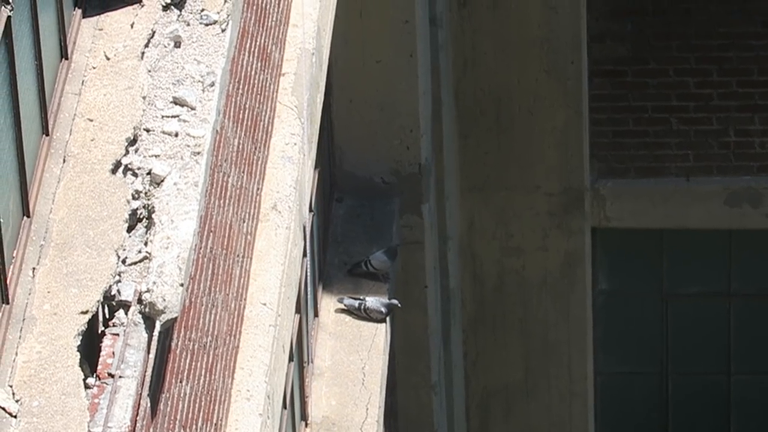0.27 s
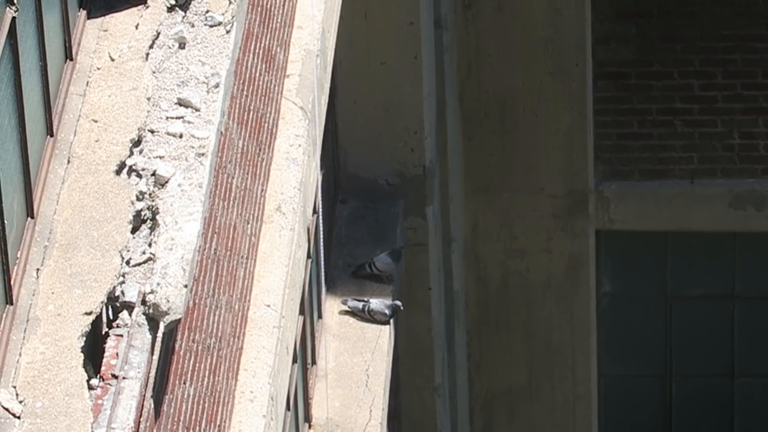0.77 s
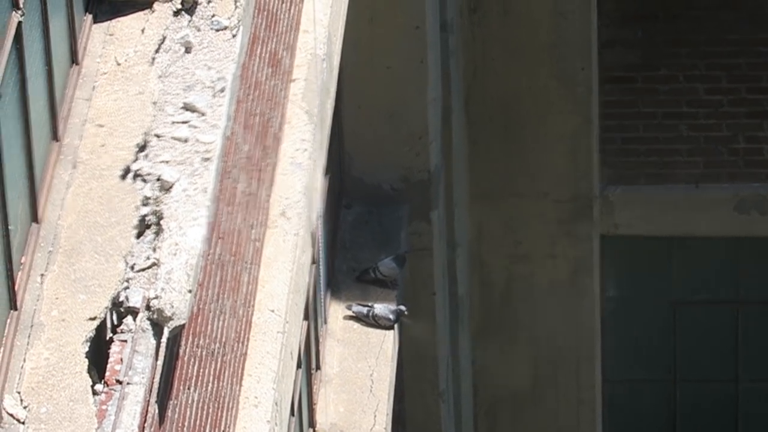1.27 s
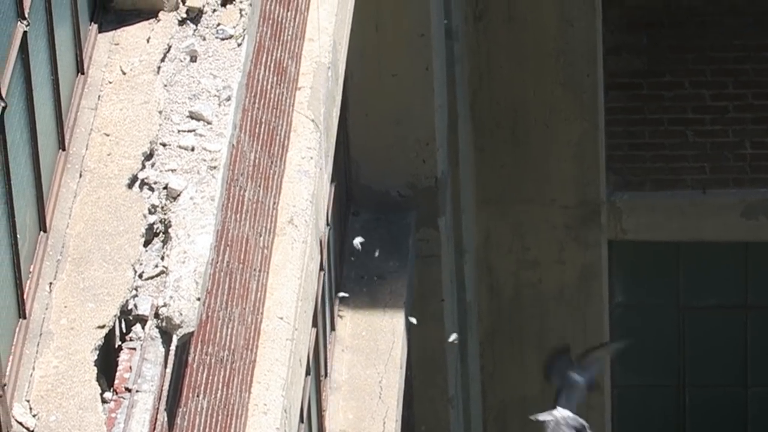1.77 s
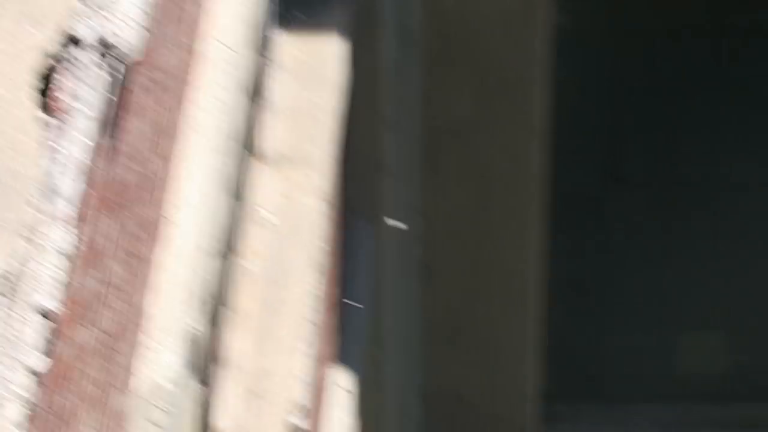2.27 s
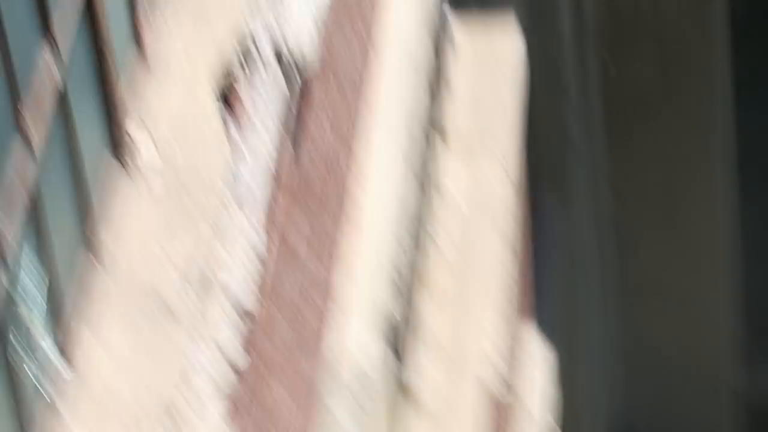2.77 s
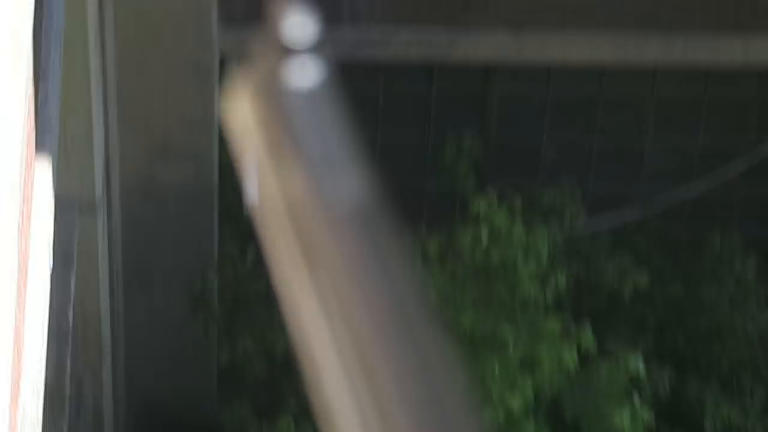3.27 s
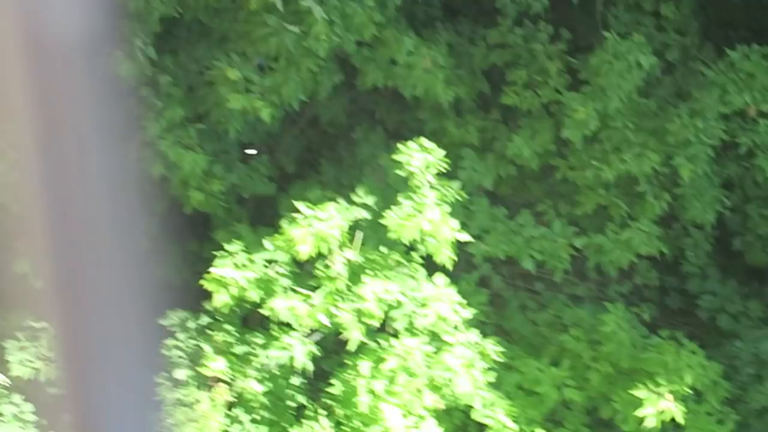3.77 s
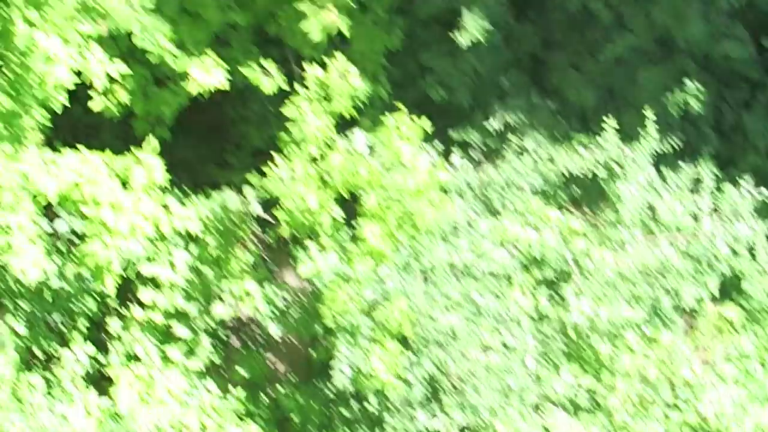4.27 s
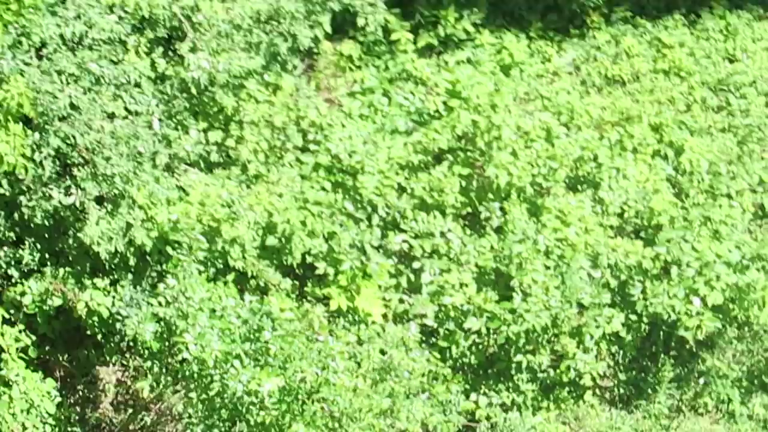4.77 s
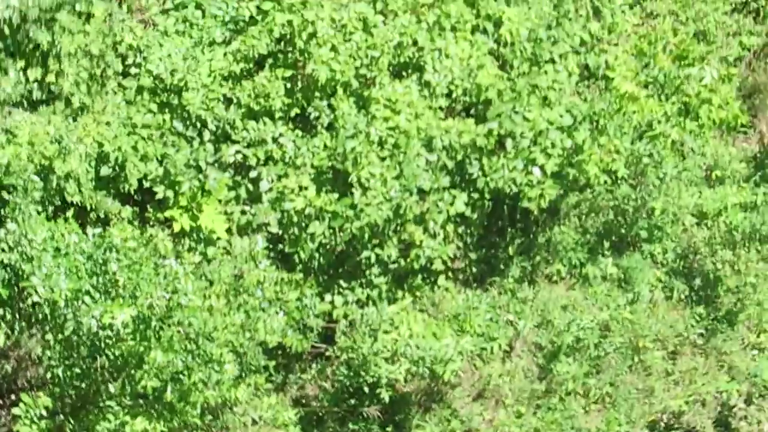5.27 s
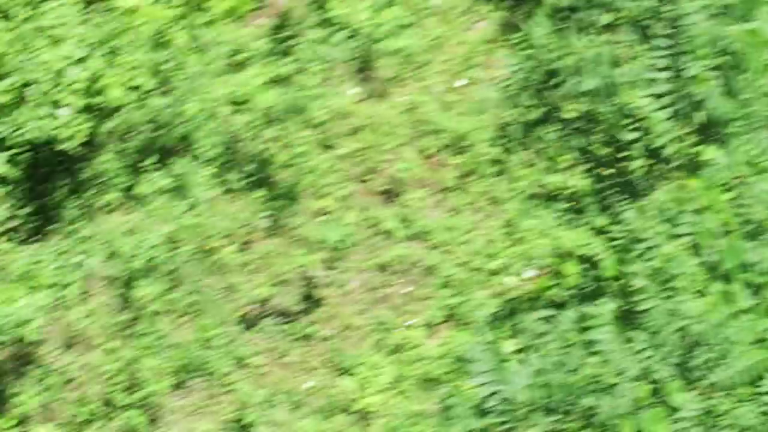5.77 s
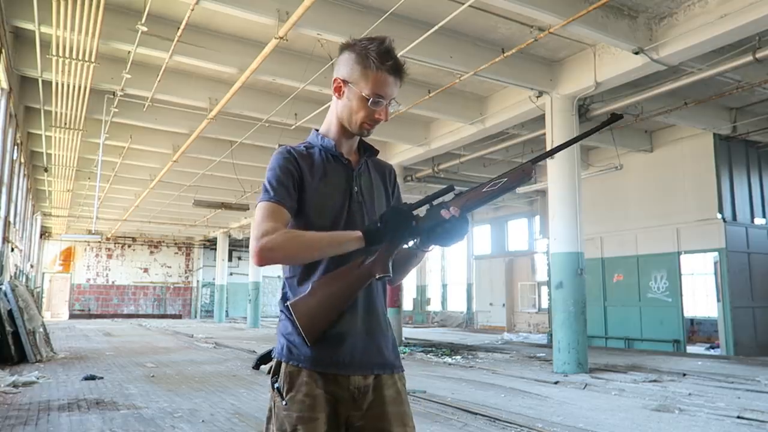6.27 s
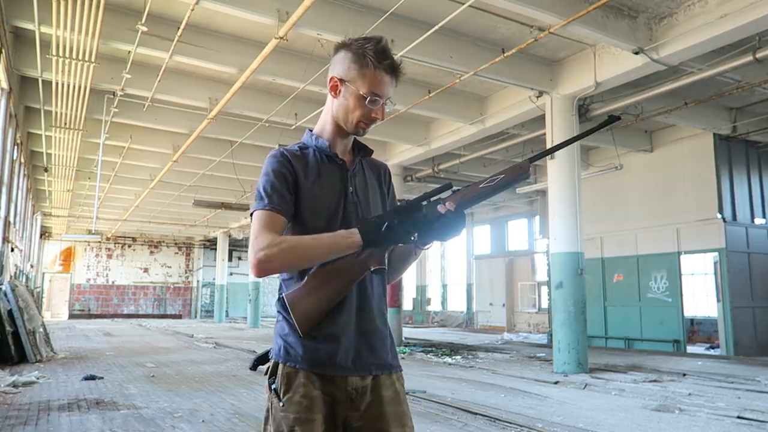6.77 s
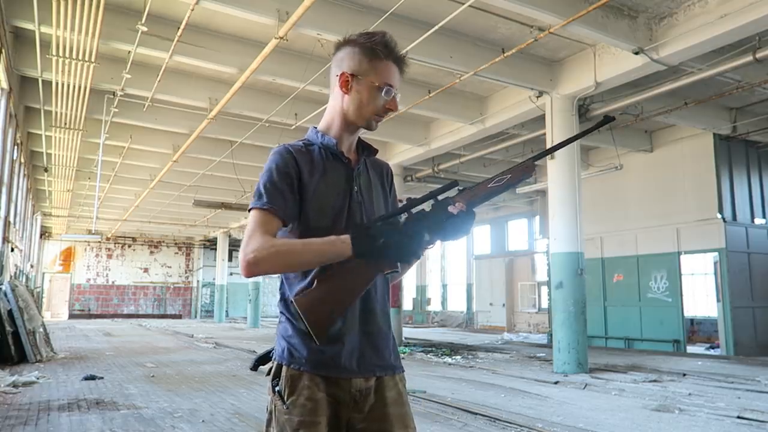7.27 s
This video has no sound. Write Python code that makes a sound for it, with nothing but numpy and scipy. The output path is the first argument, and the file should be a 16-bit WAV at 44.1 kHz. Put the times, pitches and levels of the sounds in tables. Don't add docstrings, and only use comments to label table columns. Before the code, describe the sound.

For 1.3 seconds there is steady low city rumble and drone with a wavering mid-pitched machine hum. At about 1.33 the rifle's sear and hammer click into a sharp, overloaded air blast peaking at 1.36, with a stock thump and yard echoes; the background ducks and slowly returns. The pellet smacks a ledge at 1.45, and wings clap five times from 1.56 to 1.96, fading. From 1.9 to 3.4 cloth rubs, grip ticks and a sling swivel drags; a bolt scrapes and drops home around 4.0, with another handling bump at 4.15. Wind buffets the microphone strongly from 5.4 to 5.9. At 5.96 the place switches to a wide concrete hall: gloved touches, bright steel clack at 6.26, loudest slam at 6.39, small rattles and a long ring, finger touches near 6.9, then a softer latch clack at 7.11 with settling parts and echo.

```python
import sys
import numpy as np
from scipy import signal
from scipy.io import wavfile
from scipy.ndimage import uniform_filter1d

SR = 44100
rng = np.random.default_rng(int(sys.argv[2]) if len(sys.argv) > 2 else 0)


def log_audio(samples):
    frames = np.atleast_2d(samples).T
    limited = np.clip(frames, -1, 1)
    pcm = np.round(limited * 32767).astype(np.int16)
    wavfile.write(sys.argv[1], SR, pcm)


def voltage_ratio(decibels):
    exponent = np.asarray(decibels, float) / 20
    return 10 ** exponent


N = 330750
CUT_S = 5.958
OUTSIDE_SAMPLES = round((CUT_S + .05) * SR)

BAND_EDGES_HZ = 22 * 2 ** np.arange(0, 9.7, .4)
BANK = [(np.sqrt(low * high), signal.butter(2, [low, high], "band", fs=SR, output="sos"))
        for low, high in zip(BAND_EDGES_HZ, BAND_EDGES_HZ[1:])]

# frequency in Hz, level in dB per Hz.
RUMBLE_COLOUR = [(12, -41), (20, -15), (54, -5), (113, 1.5), (150, -0.5), (200, -22), (330, -120)]
DRONE_COLOUR = [(71, -33), (120, -17.5), (206, -4.5), (304, -9.5), (357, -11), (403, -13), (572, -9.5),
                (1180, -18), (3000, -40), (3900, -70), (6600, -120)]
HISS_COLOUR = [(1060, -13.5), (1800, -10.5), (2870, -18), (8280, -26.5), (12100, -29.5), (14100, -44),
               (16000, -62.5)]
# frequency in Hz, likeness from -1 to 1.
OUT_LIKENESS = [(60, 1.0), (180, 1), (550, 0.97), (1650, 0.86), (4970, 0.27), (15000, -0.45)]
IN_LIKENESS = [(60, 0.99), (180, 0.56), (550, 0.46), (1650, 0.99), (4970, 0.66), (15000, -0.85)]
# frequency in Hz, width in Hz, level in dB.
HUM_LINES = [(362, 14.2, 1), (737, 4.5, -9.5), (628, 84, -7), (1203, 3, -15), (197.4, 22, -9),
             (576.9, 6.7, -7)]
LOW_HUM_HZ, OVERTONE_HZ = 311.7, 716
HUM_EDGE_S, HUM_EVENNESS, BREEZE_EDGE_S = 0.023, 0.52, 0.18
# start in seconds, length in seconds, level in dB.
HUM_SWELLS = [(0.17, 0.168, -46.5), (0.45, 0.077, -40), (0.72, 0.073, -42), (1.09, 0.086, -43.5),
              (1.25, 0.071, -47), (2.4, 0.19, -61.5), (2.68, 0.14, -61), (2.9, 0.11, -66),
              (3.12, 0.21, -59), (3.6, 0.18, -57), (3.86, 0.12, -41.5), (4.02, 0.29, -44),
              (4.36, 0.069, -42.5), (4.52, 0.22, -41.5), (4.88, 0.068, -42.5), (5.19, 0.039, -43),
              (5.36, 0.069, -48), (5.8, 0.17, -47)]
LOW_SWELLS = [(0.0, 0.15, -35), (0.25, 0.096, -41.5), (0.4, 0.2, -43.5), (0.62, 0.1, -40),
              (0.89, 0.17, -44.5), (1.26, 0.067, -38.5)]
OVERTONE_SWELLS = [(2.35, 0.33, -65), (2.8, 0.33, -53), (3.4, 0.48, -59.5), (5.3, 0.39, -62)]
# start in seconds, length in seconds, level in dB.
THUDS = [
    (1.0, 0.2, -42.5),
    (3.55, 0.13, -66),
    (3.95, 0.36, -61),
]
TREE_GUST = [(5.3, 0.55, -55)]
BREEZE = [(1.9, 0.77, -68), (4.05, 0.67, -63.5), (5.2, 0.86, -68)]
# calm level in dB, duck depth in dB, recovery in seconds, recovery shape.
RUMBLE_GAIN = (-44.5, 32, 2.5, 1.7)
DRONE_GAIN = (-38.5, 23, 2, 2)
HISS_GAIN = (-60.5, 14, 1.47, 2.5)
HUM_GAIN = (-51, 20, 0.96, 2)
HALL_GAIN = (-44.5, 8.5, 1.15, 1.2)
SHOT_DUCK_S, HALL_DUCK_S, DUCK_ATTACK_S = 1.37, 6.4, 0.045

# start in seconds, level in dB, t60 in seconds, tilt in dB per octave, ring in dB.
SHOT_STAGES = [(1.326, -25.5, 0.063, -2.5, -35), (1.3366, -7.5, 0.054, -1.5, -26),
               (1.342, -21, 0.081, -4.5, -25), (1.3495, -9, 0.1, 2, -28.5), (1.353, -9, 0.067, -2, -25),
               (1.3612, -3, 0.045, -1, -9.5), (1.3645, 0, 0.022, -1.8, -5.5),
               (1.377, -17, 0.016, 0.5, -39.5), (1.382, -17.5, 0.074, 1, -18.5),
               (1.398, -27.5, .05, -1, -32.5), (1.412, -27.5, 0.066, 3, -27)]
# frequency in Hz, level in dB per Hz.
BLAST_COLOUR = [(200, -22.5), (400, -13), (1100, -3), (1500, -5.5), (1900, -13), (2500, -9.5), (3900, -8),
                (8000, -13), (14000, -15), (16000, -34.5)]
# frequency in Hz, level in dB, t60 in seconds.
SHOT_MODES = [(434, -4.5, 0.035), (815, -9.5, 0.035), (1117, -5.5, 0.057), (1860, 2, 0.022),
              (3040, -10, .02), (4030, -6.5, 0.025)]
# start in seconds, level in dB, frequency in Hz, fade in seconds.
MUZZLE_SWING = (1.3623, -5.5, 232, .050)
# start in seconds, frequency in Hz, level in dB, t60 in seconds.
STOCK_THUMPS = [
    (1.3625, 92, -14.5, .06),
    (1.36, 56, -21, 0.098),
    (1.326, 170, -27, .04),
]
# frequency in Hz, level in dB per Hz.
YARD_COLOUR = [(120, -59.5), (200, -19), (353, -9.5), (491, -10.5), (1040, -4.5), (3130, -7),
               (12200, -19.5), (16000, -37)]
# frequency in Hz, t60 in seconds.
YARD_T60 = [(300, 1.7), (1500, 1.54), (5000, 1.23), (12000, 0.43)]
# start in seconds, level in dB, t60 in seconds, tilt in dB per octave, ring in dB.
JOLT = [
    (1.3532, -6, .05, -2, -11),
    (1.3562, -6.5, 0.042, -2, -10.5),
    (1.3595, -8.5, .04, -1, -13.5),
    (1.3635, -8.5, .03, -1, -20),
    (1.368, -12, .015, -5.5, -17),
]
# frequency in Hz, level in dB per Hz.
JOLT_COLOUR = [(250, -25), (450, -4), (800, 0), (1400, -2), (2000, -14), (2750, -8), (4000, -12),
               (16000, -30)]
# frequency in Hz, level in dB, t60 in seconds.
JOLT_MODES = [(480, -8, .022), (800, -1.5, .022), (1350, -4.5, .025), (2750, -3.5, .03)]

# start in seconds, level in dB, t60 in seconds, tilt in dB per octave.
STRIKES = [
    (1.4483, -19, 0.023, 0.5),
    (1.4605, -20.5, 0.046, 1),
    (1.4925, -30, 0.041, -8),
    (1.498, -24.5, 0.011, 4.5),
    (1.51, -30.5, 0.036, -1.5),
    (1.52, -34, 0.27, -1.5),
]
# level in dB, tilt in dB per octave.
CLAPS = [(-29.5, -2), (-35, -3.5), (-36, -4.5), (-42.5, -4.5), (-44, -4.5)]
FIRST_CLAP_S, CLAP_EVERY_S, CLAP_T60_S = 1.5585, .0993, 0.053

# start in seconds, level in dB, tilt in dB per octave.
RUSTLE = [(1.9072, -50, 5), (2.0314, -51.5, 1), (2.1277, -45.5, 0), (2.1492, -41, -6), (2.22, -52, -5),
          (2.2419, -39.5, -2), (2.2614, -39.5, -4), (2.273, -45, -9), (2.284, -49.5, 2),
          (2.3327, -43, -4.5), (2.36, -52, -4), (2.484, -49, -4), (2.4934, -42, -5.5), (2.596, -48, -5),
          (2.6001, -46, 4), (2.6234, -47.5, 0.5), (2.647, -47, -8), (2.6979, -41, -4), (2.7145, -47.5, 2),
          (2.731, -52, 0.5), (2.7662, -49, 1), (2.773, -51, 8.5), (2.784, -46, 6), (2.8012, -43.5, -2),
          (3.0167, -44, 28), (3.0989, -47, 3), (3.1353, -51, 5), (3.1737, -45, -6), (3.2181, -42, -1),
          (3.233, -45, -5.5), (3.2964, -37, -10), (3.3124, -43.5, -8), (3.322, -44, -7), (3.345, -43, -7),
          (4.136, -43, -1), (4.149, -33, -7), (4.2961, -44, -4)]
RUSTLE_T60_S, TOUCH_T60_S, TICK_T60_S = 0.032, 0.055, 0.045
# start in seconds, level in dB, t60 in seconds, tilt in dB per octave.
RUBS = [(1.9, -48, 0.28, -7), (2.03, -48, 0.26, -6), (2.125, -47.5, 0.31, -5), (2.24, -44.5, 0.31, -2),
        (2.33, -51, .25, -2), (2.42, -55, .2, -5), (2.59, -46.5, 0.23, -8), (2.695, -49, 0.22, 1.5),
        (2.76, -47, 0.33, -3), (3.1, -53, 0.27, 0), (3.225, -49, 0.14, -4), (4.1, -46, .15, 3)]
# frequency in Hz, level in dB per Hz.
CLOTH_COLOUR = [(700, -0.5), (1600, -1), (2500, 3), (5000, 2.5), (9000, -4.5), (13000, -8), (16000, -28)]
# start in seconds, frequency in Hz, level in dB, t60 in seconds.
PIN_PINGS = [(2.15, 4090, -50, .02), (2.333, 7600, -53, 0.035), (2.601, 4360, -56, .02),
             (2.713, 5200, -50, 0.028), (2.809, 4753, -57, 0.13), (3.388, 7600, -63, 0.027),
             (3.973, 3300, -46, 0.022), (4.002, 2660, -38, 0.055), (4.296, 2750, -55, 0.037)]
# start in seconds, scrape in dB, t60 in seconds, tilt in dB per octave, ring in dB.
BOLT = [
    (3.9707, -27.5, 0.11, -11, -26.5),
    (3.975, -47, 0.029, -5, -28.5),
]
SEAT = [
    (4.0015, -24, 0.033, -4, -31),
    (4.005, -40.5, 0.28, -2, -18),
    (4.025, -52, .05, -5, -42),
]
# frequency in Hz, level in dB, t60 in seconds.
BOLT_MODES = [(612, -15, 0.086), (975, -4.5, 0.08), (1045, -3.5, 0.084), (1260, -3, 0.027),
              (1668, -11, 0.069), (2710, -11, 0.037)]
SEAT_MODES = [(510, -7.5, 0.047), (1110, -11, 0.057), (1315, 0, 0.039), (2650, -4, 0.023)]
# start in seconds, scrape in dB, tilt in dB per octave, ring in dB.
SWIVEL_TICKS = [(3.104, -42, -11, -51), (3.116, -60, -3, -44), (3.173, -49, -1.5, -36.5),
                (3.200, -57, -3, -40.5), (3.218, -47, -5.5, -44.5), (3.250, -53, 4, -39),
                (3.279, -36, -9.5, -45), (3.326, -39, -7.5, -50)]
# start in seconds, scrape in dB, t60 in seconds, tilt in dB per octave, ring in dB.
SWIVEL_DRAGS = [(3.1, -42, 0.48, -10, -53), (3.16, -42.5, 0.32, -6, -46), (3.23, -43, 0.2, -6.5, -55),
                (3.309, -38, 0.22, -9, -49)]
# frequency in Hz, level in dB, t60 in seconds.
SWIVEL_MODES = [(344, -3, 0.018), (706, -1, 0.024), (1680, -0.5, 0.03), (1880, -1, 0.027), (2290, -6, .018),
                (2740, -12, 0.02)]

# frequency in Hz, level in dB per Hz.
WIND_COLOUR = [(12, -48), (20, -28), (75, 2.5), (101, 2), (239, -5), (380, -13.5), (407, -20.5),
               (520, -26.5), (680, -56), (1140, -120)]
# start in seconds, length in seconds, level in dB.
PUFFS = [(4.92, 0.015, -41), (5.21, 0.045, -35.5), (5.37, 0.07, -29.5), (5.46, 0.071, -30),
         (5.54, 0.086, -20.5), (5.64, 0.054, -20), (5.7, 0.036, -19), (5.75, 0.08, -26.5),
         (5.8, 0.11, -25.5), (5.4, 0.59, -34)]
PUFF_EDGE_S, WIND_PAN_DB, WIND_SWAY_DB = 0.02, -2.5, 1

# start in seconds, level in dB, tilt in dB per octave.
TOUCHES = [(6.0013, -40.5, -4), (6.034, -37, -13), (6.1055, -37.5, -0.5), (6.1245, -41, -1), (6.16, -50, 1),
           (6.8823, -36, -5.5), (6.92, -40, -7), (6.94, -30, -8), (6.9691, -38.5, -4), (7.2424, -46, -8),
           (7.4565, -38.5, -1)]
# frequency in Hz, level in dB per Hz.
GLOVE_COLOUR = [(1100, 0), (1800, -5), (3500, 1), (6000, -15), (11000, -14), (16000, -11.5)]
STEEL_COLOUR = [(120, -52), (200, -32), (1010, -9.5), (1220, -5.5), (1540, -6.5), (2680, -5), (4180, -6),
                (4840, -14.5), (6380, -14.5), (12400, -19), (16300, -22)]
HALL_COLOUR = [(150, -37.5), (300, -10), (750, -7), (1100, 1.5), (1600, 4.5), (2200, -0.5), (3300, -1),
               (4800, -7), (8000, -4.5), (15000, -23)]
HALL_AIR_COLOUR = [(12, -36), (20, -2.5), (107, -3), (399, -14), (485, -7), (558, -20), (1290, -19.5),
                   (3840, -35), (12400, -44), (14700, -51), (16000, -72)]
# frequency in Hz, t60 in seconds.
HALL_T60 = [(500, 3.2), (1400, 2.4), (2700, 2.37), (5400, 0.97), (8000, 0.54), (11000, 0.45)]
# start in seconds, level in dB, brightness from 0 to 1.
HALL_BLOWS = [
    (6.264, -3.5, 0.72),
    (6.394, 0.5, 0.29),
    (7.113, -5.5, 0.51),
    (6.939, -27, 0),
    (6.107, -22.5, 0.7),
]
# delay in seconds, spread in seconds, level in dB.
FAR_WALL = (0.11, 0.1, 3.2)
# start in seconds, scrape in dB, t60 in seconds, tilt in dB per octave, ring in dB.
LIFT = [
    (6.2636, -11, 0.0141, 0, -17),
    (6.2665, -26, 0.039, -1, -19),
    (6.2705, -19, 0.012, -1.5, -42),
    (6.279, -21, 0.15, -1, -25),
    (6.302, -30, 0.0624, 1, -29),
]
SLAM = [
    (6.3895, -25.5, 0.0382, -0.5, -30),
    (6.3935, 0.5, 0.012, 1.5, -2.5),
    (6.3952, -7.5, 0.009, 2, -14),
    (6.399, -13, 0.017, -3.5, -26),
    (6.411, -20, 0.028, -2, -36),
    (6.417, -23.5, 0.036, 3, -34),
    (6.438, -29.5, .03, 7, -37),
    (6.4435, -33, .04, 3, -35),
]
LATCH = [
    (7.103, -39.5, 0.104, 1.5, -62),
    (7.1132, -16.5, 0.0095, -1.4, -12.5),
    (7.1172, -21, 0.022, -2, -25),
    (7.131, -26, 0.067, 0.52, -46),
    (7.137, -30.5, 0.15, 2, -50),
]
# frequency in Hz, level in dB, t60 in seconds.
LIFT_MODES = [(1170, -25, 0.027), (1730, 0.5, 0.013), (2254, 6, 0.019), (2840, -1.5, 0.022),
              (3370, 2, 0.011), (11400, -5.5, 0.01)]
SLAM_MODES = [(298, -32, 0.0092), (560, -25, 0.022), (786, -13, 0.012), (1030, -5.5, 0.02),
              (1520, -3.5, 0.014), (1890, -3.5, 0.014), (2343, -1.5, 0.015), (2970, -12.5, 0.016),
              (3610, -8.5, 0.017), (6500, -26.5, .012)]
LATCH_MODES = [(1070, -7, 0.02), (1610, 0, 0.021), (2010, -11, 0.027), (3460, 7.5, 0.0062),
               (4250, -23, 0.013), (7100, -16, 0.0143)]
# frequency in Hz, width in Hz, level in dB.
HALL_RINGS = [(1080, 110, -1), (1440, 140, -2.5), (2090, 530, -8.5), (3400, 200, -8)]
HALL_PLAIN_DB = -3.5
# frequency in Hz, width in Hz, start in seconds, length in seconds, level in dB.
LINGERS = [
    (2750, 270, 6.28, 0.12, 3.5),
    (1500, 200, 7.185, 0.049, -3),
    (1450, 100, 6.43, 0.12, -0.5),
    (1060, 68, 6.42, 0.19, -4),
    (1500, 53, 6.64, .1, -1),
]
# start in seconds, length in seconds, level in dB.
HALL_THUDS = [
    (6.25, 0.17, -46),
    (6.85, 0.32, -49.5),
]
# start in seconds, level in dB, t60 in seconds, tilt in dB per octave.
CHATTER = [(6.2825, -25, .025, 3), (6.2895, -26, 0.027, 1.5), (6.309, -32, 0.072, 0),
           (6.326, -33.5, .04, 1), (7.1308, -24, .015, 1), (7.139, -33, .02, 3), (7.165, -32, 0.027, 3.5),
           (7.1843, -32, .03, -4), (7.203, -32.5, 0.032, -5.5)]
# start in seconds, frequency in Hz, level in dB, t60 in
# seconds.
ACTION_PINGS = [(6.3941, 1480, 0.5, 0.012), (6.3975, 2100, -17, .03), (6.3972, 1150, -18, .03),
                (6.3935, 200, -27.5, 0.047), (7.113, 3510, -16, .012), (6.2835, 2700, -30, .03),
                (6.302, 3000, -28, .03), (6.318, 9700, -42, .03), (7.1312, 9100, -34, .02),
                (7.131, 7200, -34, .02), (7.139, 5900, -37, .03), (7.165, 7400, -36, .025),
                (7.118, 7400, -36, .02), (7.1845, 1500, -33, .05)]


def rms_one(x):
    return x / np.sqrt(np.mean(x ** 2) + 1e-20)


def at_hz(points, hz):
    points_hz, values = np.array(points).T[:2]
    return np.interp(np.log(hz), np.log(points_hz), values)


def drift(rate_hz, size=N):
    r = np.exp(-80 * np.pi * rate_hz / SR)
    white = rng.standard_normal(size // 40 + 2002)
    slow = signal.lfilter([1], [1, -2 * r, r * r], white)[2000:]
    return np.interp(np.arange(size) / 40, np.arange(len(slow)), rms_one(slow))


def noise(spectrum, likeness, patchy_db=0., t60s=None, size=N):
    out = 0
    together = drift(2.4, size)
    white = rng.standard_normal((2, 2, size))
    for k, (hz, sos) in enumerate(BANK):
        if not spectrum[0][0] <= hz <= spectrum[-1][0] or at_hz(spectrum, hz) < -65:
            continue
        mid, side = signal.sosfilt(sos, white[k % 2])
        alike = np.clip(at_hz(likeness, hz), -.99, .99)
        level_db = at_hz(spectrum, hz) + patchy_db * (.6 * together + drift(22, size))
        if t60s:
            level_db = level_db - 60 * np.arange(size) / SR / at_hz(t60s, hz)
        gain = np.repeat(voltage_ratio(level_db[::8]), 8)[:size]
        out = out + gain * (np.sqrt(1 + alike) * mid + np.sqrt(1 - alike) * side * [[1], [-1]])
    return rms_one(out)


def lasting(rows, t60_s):
    return [(s, db, t60_s, *rest) for s, db, *rest in rows]


def knocks(events, spectrum, modes=(), grain_db=0., side_db=-10., side_tilt=4.2, patch_db=0., detune=0.,
           rise_share=0.02, snap_db=-60.5):
    out = np.zeros((2, N))
    t = np.arange(6000) / SR
    for s, peak_db, t60, tilt, *ring_db in events:
        rise = rise_share * t60
        patch = patch_db * rng.standard_normal(len(BANK))
        slip = 1 + detune * rng.standard_normal()
        attack = np.sin(np.pi / 2 * np.minimum(t / max(2 * rise, 1e-4), 1)) ** 2
        fade_db = -60 * np.maximum(t - 2 * rise, 0) / max(t60, .005)
        white = rng.standard_normal((2, len(t)))
        grit = white * voltage_ratio(grain_db * np.minimum(rng.exponential(1, len(t)), 5)) * attack
        grit[0, round(rise * SR)] += voltage_ratio(snap_db) * grit.std()
        heard = int((.01 + .8 * t60) * SR)
        grit, fade_db = grit[:, :heard], fade_db[:heard]
        sound = 0
        for k, (hz, sos) in enumerate(BANK):
            if hz > spectrum[0][0]:
                octave = np.log2(max(hz, 600) / 2000)
                port_db = np.array([[0], [side_db + side_tilt * octave]])
                gains = voltage_ratio(at_hz(spectrum, hz) + tilt * octave + patch[k] + port_db)
                faded = grit * voltage_ratio(fade_db * 2 ** (.15 * octave))
                sound = sound + gains * signal.sosfilt(sos, faded) * (-1) ** k
        burst = voltage_ratio(peak_db) * sound / np.abs(sound[0]).max()
        mid, side = np.pad(burst, ((0, 0), (0, len(t) - sound.shape[1])))
        for k, (hz, level_db, ring_s) in enumerate(modes):
            strength = voltage_ratio(ring_db[0] + level_db + tilt * np.log2(hz / 2000) - 60 * t / ring_s)
            mid = mid + strength * np.sqrt(attack) * np.sin(2 * np.pi * hz * slip * t) * (-1) ** k
        i = round(s * SR)
        out[:, i:i + len(t)] += (mid + side * [[1], [-1]])[:, :N - i]
    return out


def pings(rows):
    out = np.zeros(N)
    t = np.arange(6000) / SR
    for s, hz, db, t60 in rows:
        ring = voltage_ratio(db - 60 * t / t60) * np.sin(2 * np.pi * hz * t)
        out[round(s * SR):][:len(t)] += ring * np.minimum(t / .001, 1)
    return out


def echoes(blows, colour, t60s, likeness, patchy_db, build_s, wet_db, bloom=(1, 1, 0)):
    t = np.arange(60000) / SR
    delay_s, spread_s, bloom_db = bloom
    swell = (1 - np.exp(-t / build_s)) * voltage_ratio(bloom_db * np.exp(-((t - delay_s) / spread_s) ** 2))
    tail = noise(colour, likeness, patchy_db, t60s, size=len(t)) * swell
    drive = np.zeros((1, N))
    for s, db, bright in blows:
        i = round(s * SR)
        drive[0, i:i + 2] = voltage_ratio(db + 16) * np.array([1, -bright])
    return voltage_ratio(wet_db) * signal.fftconvolve(drive, tail, axes=1)[:, :N]


def resonance(x, hz, width_hz):
    r = np.exp(-np.pi * width_hz / SR)
    poles = [1, -2 * r * np.cos(2 * np.pi * hz / SR), r * r]
    return signal.lfilter((1 - r * r) / 2 * np.array([1, 0, -1]), poles, x + 1e-18)


def ducked(start_s, calm_db, depth_db, recovery_s, shape):
    steps = np.arange(0, N + 32, 32)
    t = np.maximum(steps / SR - start_s, 0)
    drop = (1 - np.exp(-t / DUCK_ATTACK_S)) * np.exp(-(t / recovery_s) ** shape)
    return np.interp(np.arange(N), steps, calm_db - depth_db * drop)


def swells(rows, edge_s):
    t = np.arange(0, N + 32, 32) / SR
    gain = 0
    for s, length, db in rows:
        inside = np.minimum(t - s, s + length - t)
        gain = gain + voltage_ratio(db) * np.clip(inside / edge_s + .5, 0, 1) ** 2
    return np.interp(np.arange(N) / SR, t, gain)


def hum_line(hz, width_hz):
    r = np.exp(-np.pi * width_hz / SR)
    poles = [1, -2 * r * np.cos(2 * np.pi * hz / SR), r * r]
    once = signal.lfilter([1, 0, -1], poles, rng.standard_normal(N))
    tone = rms_one(signal.lfilter([1], poles, once))
    power = uniform_filter1d(tone ** 2, size=900) + .01
    return rms_one(tone / power ** (HUM_EVENNESS / 2))


def machine_hum():
    main = sum(voltage_ratio(db) * hum_line(hz, width) for hz, width, db in HUM_LINES)
    main_gain = voltage_ratio(ducked(SHOT_DUCK_S, *HUM_GAIN)) + swells(HUM_SWELLS, HUM_EDGE_S)
    low = swells(LOW_SWELLS, HUM_EDGE_S) * hum_line(LOW_HUM_HZ, 6.8)
    overtone = swells(OVERTONE_SWELLS, BREEZE_EDGE_S) * hum_line(OVERTONE_HZ, 27.0)
    return voltage_ratio(-4.0) * main_gain * main + low + overtone


def city():
    rumble_gain = voltage_ratio(ducked(SHOT_DUCK_S, *RUMBLE_GAIN) + 3.0) + swells(THUDS, BREEZE_EDGE_S / 2)
    drone_gain = voltage_ratio(ducked(SHOT_DUCK_S, *DRONE_GAIN) - 0.5) + swells(TREE_GUST, BREEZE_EDGE_S)
    hiss_gain = voltage_ratio(ducked(SHOT_DUCK_S, *HISS_GAIN) + 2.5) + swells(BREEZE, BREEZE_EDGE_S)
    out = machine_hum()
    for gain, colour, patchy_db in ((rumble_gain, RUMBLE_COLOUR, 1.5), (drone_gain, DRONE_COLOUR, 1.2),
                                    (hiss_gain, HISS_COLOUR, 1.0)):
        layer = noise(colour, OUT_LIKENESS, patchy_db, size=OUTSIDE_SAMPLES)
        out = out + gain * np.pad(layer, ((0, 0), (0, N - OUTSIDE_SAMPLES)))
    return out


def muzzle_swing():
    s, peak_db, hz, t60 = MUZZLE_SWING
    t = np.maximum(np.arange(N) / SR - s - np.array([[.0003], [0]]), 0)
    return -voltage_ratio(peak_db - 60 * (t / t60 * 3) ** 4) * np.sin(2 * np.pi * hz * t * (1 - 12 * t))


def shot():
    stages = knocks(SHOT_STAGES, BLAST_COLOUR, SHOT_MODES, grain_db=3.0, side_db=-6.5, side_tilt=4.4,
                    detune=0.032, snap_db=10.5)
    yard = echoes([(1.364, 0.00039, 0.018)], YARD_COLOUR, YARD_T60, OUT_LIKENESS, patchy_db=1.9,
                  build_s=0.011, wet_db=-63.0)
    return stages + muzzle_swing() + pings(STOCK_THUMPS) + yard


def recoil():
    jolt = knocks(JOLT, JOLT_COLOUR, JOLT_MODES, grain_db=2.5, side_db=-40, detune=.03, rise_share=0.021)
    return jolt.mean(axis=0) * [[1], [-1]]


def pigeons():
    claps = [(FIRST_CLAP_S + CLAP_EVERY_S * k, db, CLAP_T60_S, tilt) for k, (db, tilt) in enumerate(CLAPS)]
    strikes = knocks(STRIKES, YARD_COLOUR, grain_db=1.0, side_db=-29, rise_share=0.035, snap_db=-1)
    return strikes + knocks(claps, YARD_COLOUR, side_db=-28, rise_share=0.071, patch_db=-0.5)


def handling():
    ticks = knocks(lasting(RUSTLE, RUSTLE_T60_S), CLOTH_COLOUR, grain_db=2.5, side_db=-18, patch_db=3.5,
                   rise_share=0.014, snap_db=5)
    rubs = knocks(RUBS, CLOTH_COLOUR, grain_db=4.0, side_db=-17, patch_db=1.0, rise_share=0.039)
    bolt = knocks(BOLT, CLOTH_COLOUR, BOLT_MODES, side_db=-10.0)
    seat = knocks(SEAT, CLOTH_COLOUR, SEAT_MODES, side_db=-11)
    swivel = knocks(lasting(SWIVEL_TICKS, TICK_T60_S) + SWIVEL_DRAGS, CLOTH_COLOUR, SWIVEL_MODES,
                    grain_db=4.5, side_db=-14, patch_db=3.0, detune=0.057)
    return voltage_ratio(-0.5) * ticks + rubs + pings(PIN_PINGS) + bolt + seat + swivel


def gust():
    size = round(1.5 * SR)
    pan_db = WIND_PAN_DB + WIND_SWAY_DB * drift(3.8, size)
    likeness = [(60, 0.94), (110, 0.98), (200, 0.22), (400, 0.019)]
    eddies = noise(WIND_COLOUR[:-2], likeness, 1.5, size=size)
    evened = eddies / np.sqrt(uniform_filter1d(np.mean(eddies ** 2, axis=0), size=2600))
    lumps = rms_one(evened * voltage_ratio(3.2 * drift(33.0, size))) * voltage_ratio(pan_db / 2 * [[1], [-1]])
    placed = np.pad(lumps, ((0, 0), (OUTSIDE_SAMPLES - size, N - OUTSIDE_SAMPLES)))
    return placed * swells(PUFFS, PUFF_EDGE_S)


def hall_air():
    early = SR // 4
    tone = noise(HALL_AIR_COLOUR, IN_LIKENESS, 1.3, size=N - OUTSIDE_SAMPLES + early)
    tone = np.pad(tone, ((0, 0), (OUTSIDE_SAMPLES - early, 0)))
    low_band = signal.butter(2, [35, 110], "band", fs=SR, output="sos")
    thud = rms_one(signal.sosfilt(low_band, rng.standard_normal(N)))
    return voltage_ratio(ducked(HALL_DUCK_S, *HALL_GAIN) + 1.5) * tone + swells(HALL_THUDS, BREEZE_EDGE_S) * thud


def hall_echoes():
    wet = echoes(HALL_BLOWS, HALL_COLOUR, HALL_T60, IN_LIKENESS, patchy_db=1.86, build_s=0.011,
                 wet_db=-54.5, bloom=FAR_WALL)
    lingering = sum(swells([row], HUM_EDGE_S) * resonance(wet, hz, width) for hz, width, *row in LINGERS)
    rings = sum(voltage_ratio(db) * resonance(wet, hz, width) for hz, width, db in HALL_RINGS)
    return lingering + voltage_ratio(HALL_PLAIN_DB) * wet + rings


def hall():
    touches = knocks(lasting(TOUCHES, TOUCH_T60_S), GLOVE_COLOUR, grain_db=2.5, side_db=-12.5, patch_db=4.0,
                     rise_share=0.008, snap_db=8)
    moves = (LIFT, LIFT_MODES), (SLAM, SLAM_MODES), (LATCH, LATCH_MODES)
    clacks = sum(knocks(hits, STEEL_COLOUR, modes, side_db=-13.0, side_tilt=2.3, snap_db=11.5)
                 for hits, modes in moves)
    return hall_air() + voltage_ratio(0.5) * touches + clacks + hall_echoes()


def chatter():
    parts = knocks(CHATTER, STEEL_COLOUR, grain_db=2.5, side_db=-10.5, side_tilt=2.3, snap_db=2)
    return parts + pings(ACTION_PINGS)


def scene():
    outside = city() + shot() + recoil() + pigeons() + handling() + gust()
    inside = hall() + chatter()
    after = np.clip((np.arange(N) / SR - CUT_S) / 0.019, 0, 1)
    return outside * (1 - after) + inside * after


def band_limit(x):
    return signal.sosfilt(signal.butter(12, 16470, fs=SR, output="sos"), x)


def record(dry):
    ceiling = .71
    limited = dry / (1 + np.abs(dry / ceiling) ** 6) ** (1 / 6)
    top_cut = signal.cheby2(10, 70, 17100, fs=SR, output="sos")
    return band_limit(signal.sosfilt(top_cut, limited))


dry = scene()
out = record(dry)
log_audio(out)
```